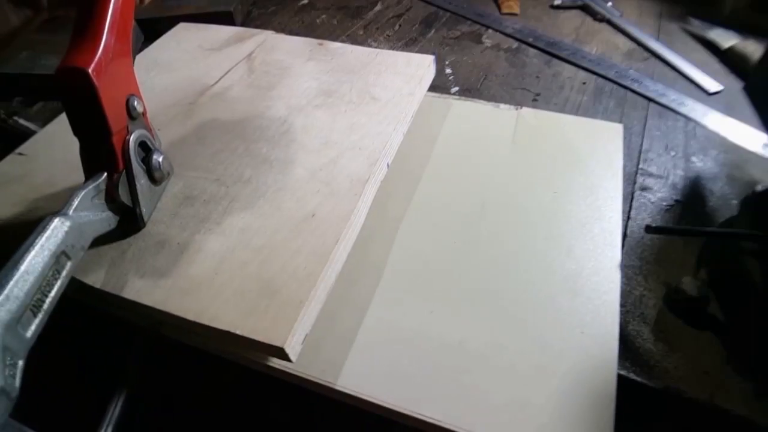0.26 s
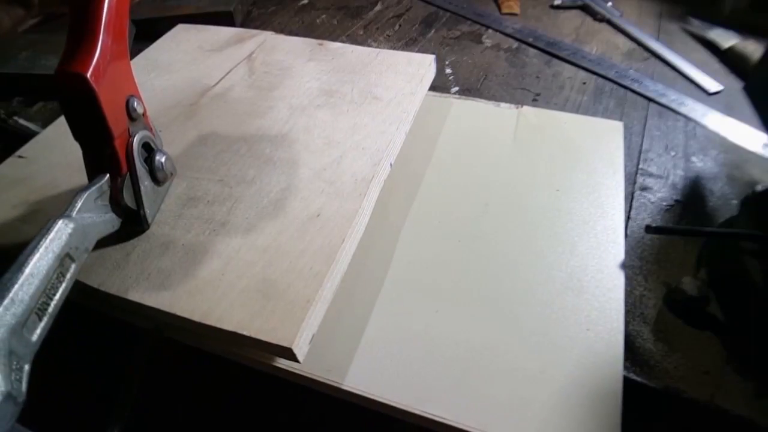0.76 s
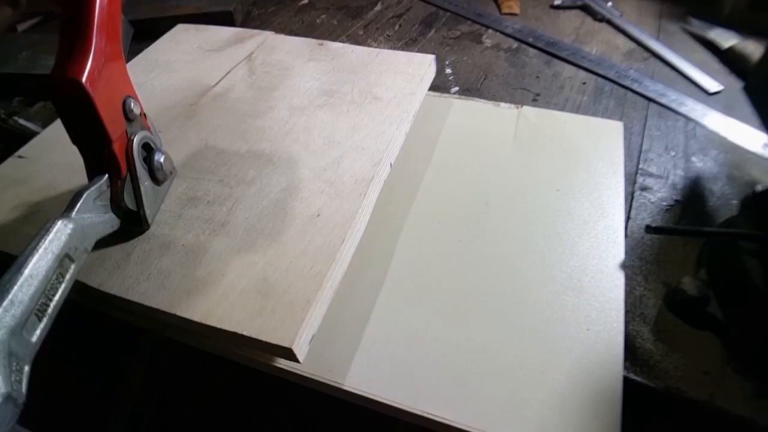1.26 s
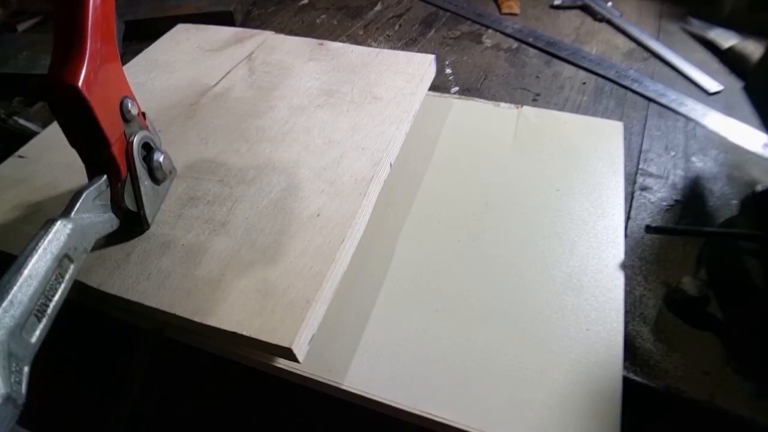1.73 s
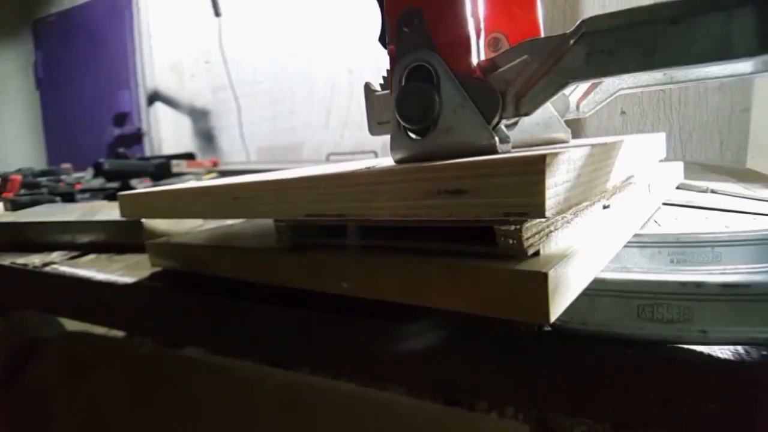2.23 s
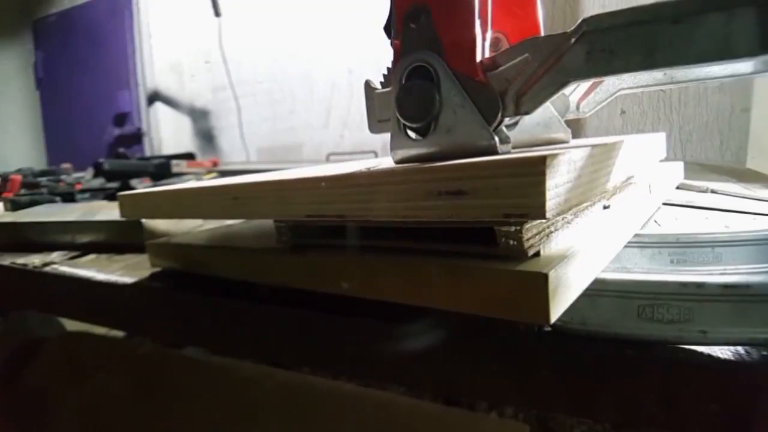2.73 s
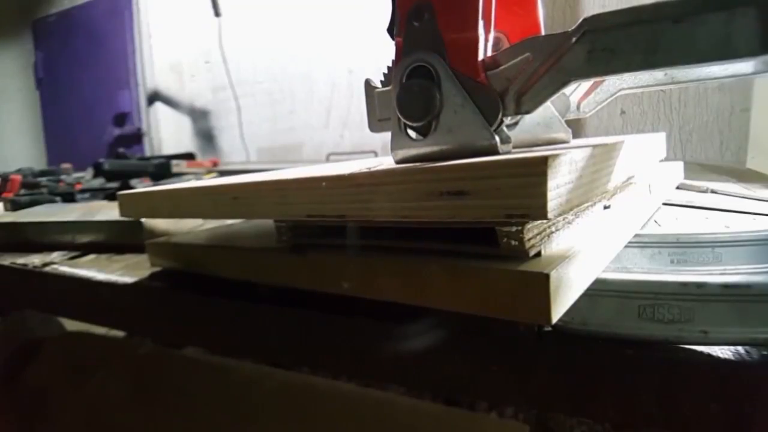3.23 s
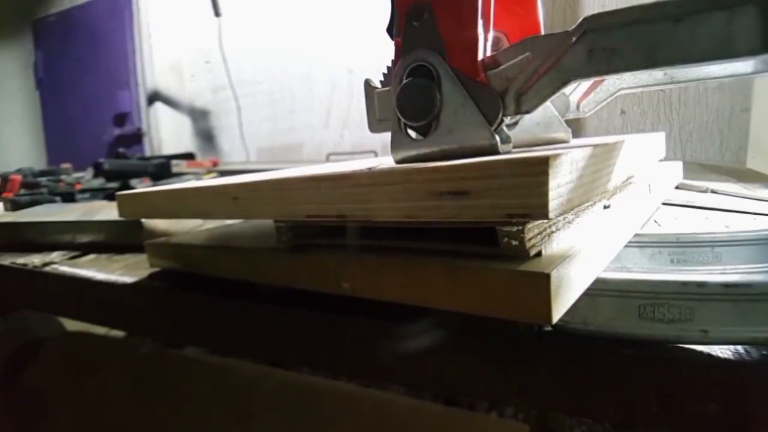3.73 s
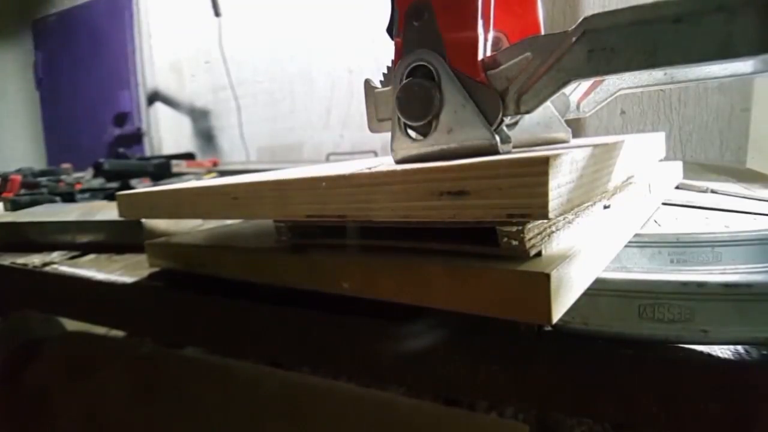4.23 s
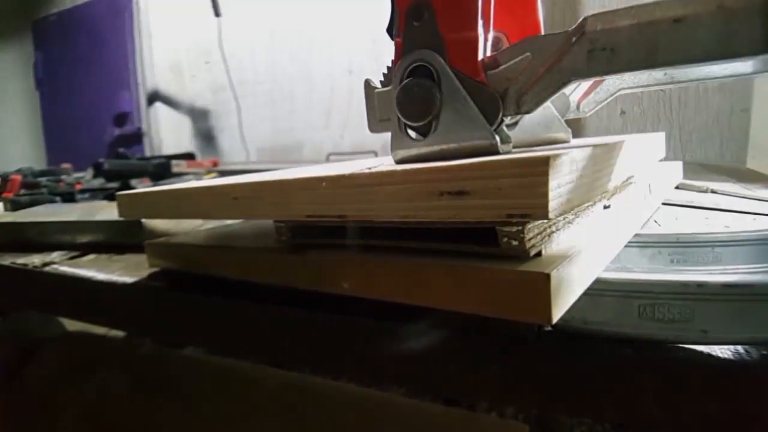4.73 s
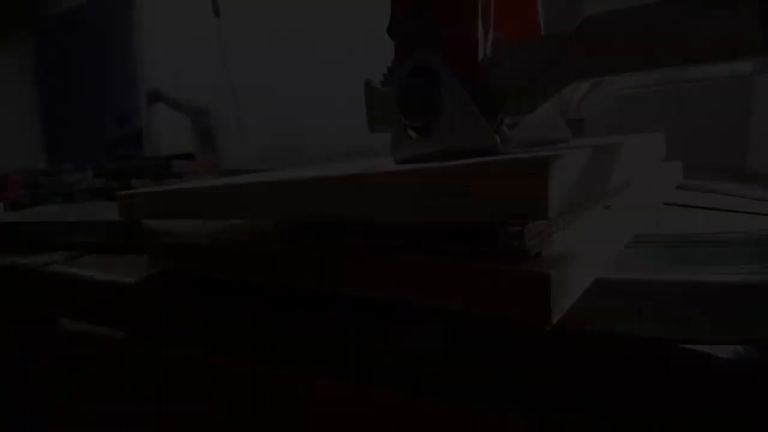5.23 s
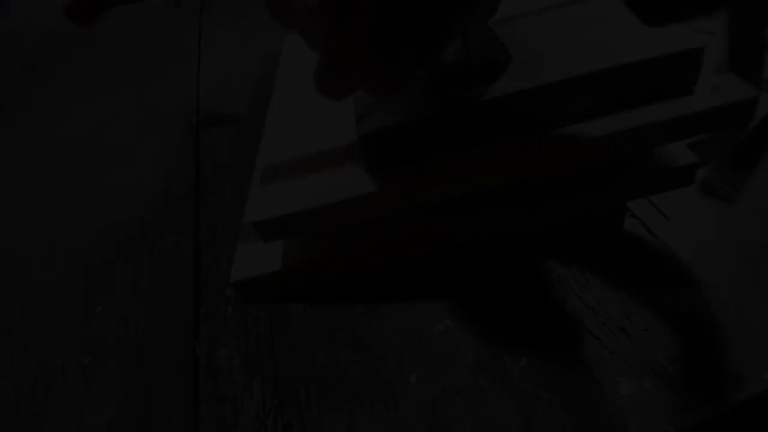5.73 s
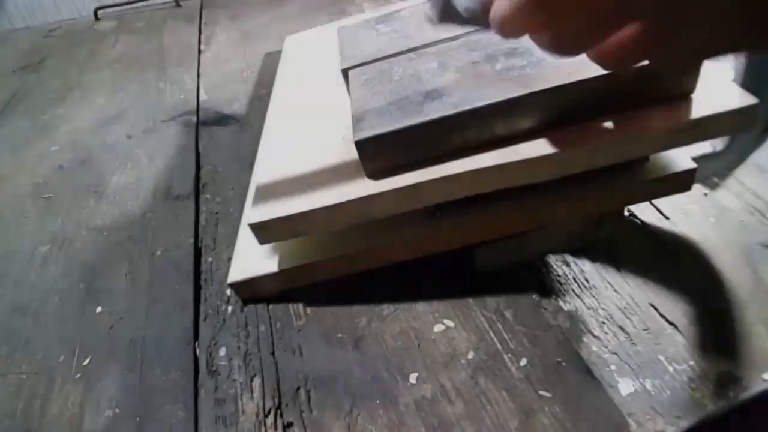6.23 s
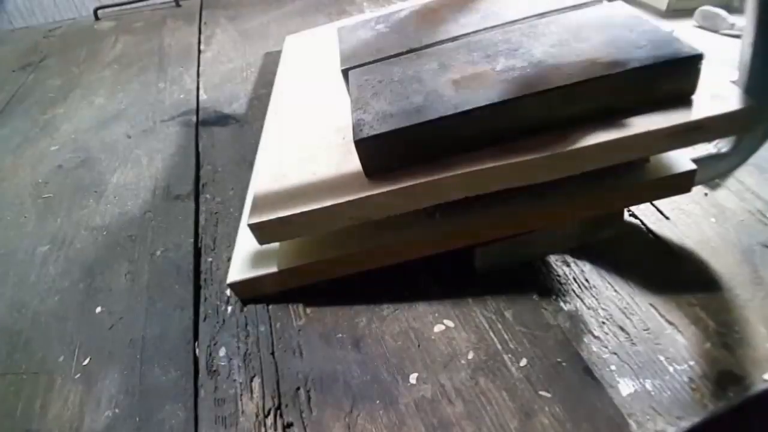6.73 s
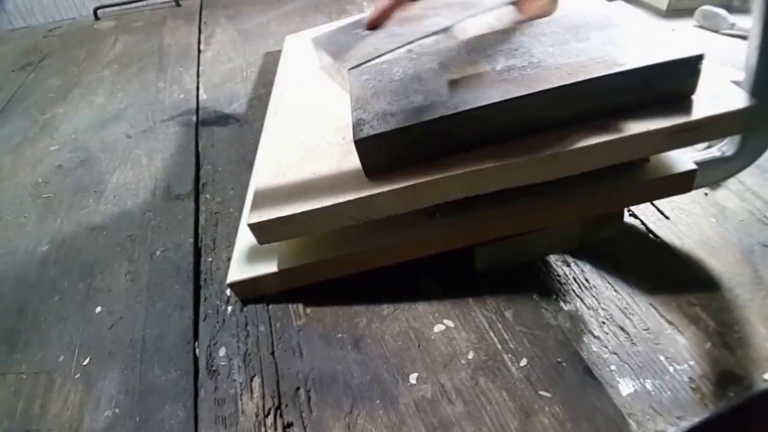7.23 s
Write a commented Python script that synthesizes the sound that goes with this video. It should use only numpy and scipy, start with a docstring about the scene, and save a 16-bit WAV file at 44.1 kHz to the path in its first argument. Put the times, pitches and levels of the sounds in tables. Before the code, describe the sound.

Over a low room hum, a clamp clacks loudly four times about a second apart; hands rustle, steel blocks thud, scrape and slide on wood.

```python
"""Quiet workshop: a ratchet clamp snaps shut four times on plywood boards, hands and sleeves rustle over
the bench, then steel blocks are set down and dragged. Low hum and faint hiss lie underneath; the sound fades
and returns twice. Struck parts are sums of decaying modes; rubbing, dragging, hum and hiss are shaped noise;
blows and blocks get an echo of decaying noise bands."""
import sys
import numpy as np
from scipy import signal
from scipy.fft import rfft, irfft
from scipy.io import wavfile

SR = 44100
rng = np.random.default_rng(int(sys.argv[2]) if len(sys.argv) > 2 else 0)


def digitize_waveform(pressure):
    """Quantize a signal to 16-bit integers and store it at the path in sys.argv[1].

    Rows of a 2-D input are taken as channels; values are limited to [-1, 1].
    """
    field = np.atleast_2d(pressure).T
    bounded = np.clip(field, -1, 1)
    quanta = np.round(bounded * 32767).astype(np.int16)
    wavfile.write(sys.argv[1], SR, quanta)


N = 330309

# jaw knocking on the boards: t/s, peak/dB, f/Hz, length/ms, board ring re peak/dB, L-R/dB
KNOCKS = [(0.383, -29.5, 364, 11.7, -4, -2.5), (0.399, -20.5, 830, 10, -1, -0.5),
          (1.34, -34, 397, 16, -3, 1), (1.365, -13.5, 1128, 11, -6.5, -1.5),
          (2.398, -33.5, 840, 11.6, -0.5, -3), (2.413, -5, 890, 18.5, -9, -3.5),
          (3.1, -34.5, 870, 16, -27.5, 6.5), (3.136, -31, 898, 11.2, -11, -4),
          (3.139, -36.5, 1312, 9, -8.5, 5), (3.263, -5, 871, 12.3, -14, -4)]
# board modes: f/Hz, level/dB, t60/s
BOARD_MODES = [(209, -10, 0.077), (391, -3.5, 0.051), (587.6, -16.5, 0.038), (649.3, -3, 0.19),
               (782, -4, 0.057), (840, -2.5, 0.16), (904, 1.5, 0.076), (955, -5, 0.11), (1030, -6.5, 0.071),
               (1042, -3.5, 0.17), (1135, -4.5, 0.11), (1232, -1, 0.066), (1340, -5.5, 0.15),
               (1534, -9.5, 0.057)]
# ratchet pawl snapping home: t/s, level/dB, brightest f/Hz, crack re level/dB, ring and echo re level/dB, L-R/dB
SNAPS = [(0.3844, -19.5, 2777, -10, 14, 2.5), (0.3965, -6, 5700, 0, 8, 3), (1.3646, -5, 5370, -5.5, 4, 4.5),
         (2.3973, -36.5, 2506, -1, 6.5, 0.5), (2.413, -17.5, 3025, -1, 14, 1),
         (2.4188, -10.5, 3900, 2, 4.5, 1.5), (3.138, -35, 3400, -26, 3, -1.5),
         (3.2625, -25, 2795, 1, 24, 6.5), (3.266, -5.5, 3730, -6, -4, 5)]
# clamp steel modes: f/Hz, level/dB, t60/s
CLAMP_MODES = [(1280, -1, .015), (2170, -4, .012), (2560, -9, .012), (2910, -1, .016), (3400, -7, .012),
               (3740, 1, .013), (4200, -5, .012), (4700, -8, .012), (5300, -3, .012), (5900, -5, .012),
               (6720, 1, .012), (8500, -14, .01)]
# clamp bar and loose parts ringing on: f/Hz, level/dB, t60/s
JANGLE_MODES = [(1660, -1, .14), (1880, -1, .18), (2215, -2, .15), (2545, -1, .14), (2912, -1, .18),
                (3343, -5, .13), (3740, -5, .15), (4300, -8, .14), (4750, -6, .14), (5400, -7, .13),
                (5930, -12, .12), (6720, -10, .12)]
# pawl crack colour: f/Hz, level/dB per Hz
CRACK_COLOUR = [(900, -8), (1500, 0.5), (3500, 4.5), (5500, -14), (7000, -7), (8500, -17.5), (16000, -13)]
# steel on steel: t/s, clink level/dB, ring f/Hz, thud level/dB, thud f/Hz, L-R/dB
CLINKS = [(5.795, -46.5, 11500, -59.5, 864, -8), (5.8104, -43.5, 7320, -62, 301, -5),
          (5.8385, -48, 3870, -65, 301, 22), (5.902, -43, 3920, -39, 600, -2),
          (5.9268, -67, 5490, -28.5, 920, 1), (6.001, -34.5, 5160, -21.5, 560, -15),
          (6.0145, -35, 5050, -22, 700, 0), (6.0304, -36, 4900, -20, 422, -3),
          (6.1604, -32.5, 5000, -14.5, 667, -14), (6.236, -36.5, 5840, -22, 330, -4),
          (6.3043, -48, 5200, -19.5, 643, -18), (6.3426, -40.5, 5500, -25, 434, 31),
          (6.3519, -71, 5200, -24.5, 930, 10)]
# steel block modes: f/Hz, level/dB, t60/s
STEEL_MODES = [(3100, -4, .08), (3800, -2, .3), (4040, -5, .15), (5140, -3, .11), (5560, -1, .14),
               (6200, -4, .06), (7130, -12, .25), (8890, -6, .3), (11640, -6, .2), (14560, -1, .16)]
# blocks dragged: t/s, bench rumble level/dB, plank drone level/dB
DRAG = [(5.8, -75.5, -77), (5.832, -51.5, -48), (5.978, -46, -46), (6.024, -26, -37), (6.168, -37, -35),
        (6.238, -25, -42), (6.294, -32.5, -42), (6.352, -28.5, -36.5), (6.454, -48.5, -42.5),
        (6.572, -35, -40.5), (6.636, -64.5, -56.5), (6.76, -52, -66)]
# bench resonances: f/Hz, width/Hz, level/dB
BENCH_PEAKS = [(88, 56, -3.5), (150.6, 30, 3.5)]
# plank resonances: f/Hz, width/Hz, level/dB
PLANK_PEAKS = [(203.1, 79, 2.5), (300, 56, 7.5)]
# board stack resonances: f/Hz, width/Hz, level/dB
STACK_PEAKS = [(425.2, 12, 4.5), (496.7, 55, -8), (641.4, 74, -2), (853, 140, -6), (955, 160, -9.5),
               (1320, 86, -20)]
# grit hiss colour: f/Hz, level/dB per Hz
GRIT_COLOUR = [(1200, -13.5), (1320, -1.5), (2130, -8), (4080, -6), (4550, -9.5), (5300, -7), (7250, -20.5),
               (16000, -27.5)]
# steel squealing as it slides: t/s, hold/s, level/dB, f/Hz
SQUEALS = [(6.036, 0.071, -47.5, 5100), (6.18, 0.038, -48.5, 4040), (6.356, 0.02, -51.5, 3830),
           (6.44, 0.089, -64, 5400), (6.495, 0.081, -57, 1910), (7.33, .04, -53.5, 3490)]
# block slid along the wood: t/s, level/dB
SLIDE = [(7.28, -72), (7.33, -42), (7.372, -36.5), (7.38, -29), (7.43, -27.5), (7.49, -28)]
# resonances of the slide: f/Hz, width/Hz, level/dB
SLIDE_PEAKS = [(151, 21, 1), (585, 70, -1), (800, 94, 0), (950, 110, 2.5), (1180, 120, 3), (1740, 250, -12),
               (2100, 200, -2), (3030, 89, -13.5), (3500, 200, -20.5)]
# hand movements over the bench: t/s, hold/s, rubbing level/dB, cloth level/dB
STROKES = [(0.0, 0.068, -67, -71), (0.871, 0.081, -58.5, -65), (1.049, 0.35, -69, -71.5),
           (1.942, 0.2, -57.5, -66), (3.142, 0.0039, -45, -77), (3.435, .1, -56.5, -70),
           (3.598, 0.042, -59, -58.5), (3.693, 0.12, -46, -52), (3.804, 0.01, -38, -48),
           (3.892, 0.018, -42.5, -50.5), (3.979, 0.0089, -41, -45), (4.102, 0.13, -59.5, -59),
           (4.348, 0.051, -51.5, -54.5), (4.522, 0.085, -50.5, -58.5), (4.656, 0.44, -63.5, -61),
           (4.78, 0.016, -58, -57), (5.152, 0.063, -52, -56), (5.374, 0.049, -54, -57),
           (6.717, 0.71, -66, -78.5), (7.115, 0.046, -82, -57.5)]
# rubbing colour: f/Hz, level/dB per Hz
RUB_COLOUR = [(88, -35), (150, -5.5), (177, -10.5), (273, -2), (403, -8), (986, -5.5), (1150, -9.5),
              (2500, -18.5), (3600, -70.5)]
# cloth colour: f/Hz, level/dB per Hz
CLOTH_COLOUR = [(800, -20.5), (1730, -3.5), (2040, -7), (3740, -7), (8530, -17.5), (13300, -19),
                (16000, -42)]
# ticks of grit and fingers: t/s, level/dB, f/Hz
TICKS = [(0.6113, -40, 3100), (2.634, -40, 4000), (2.845, -41, 2460), (3.103, -44, 2500),
         (3.5174, -35, 3866), (3.598, -30, 1780), (3.649, -31, 4330), (3.677, -22, 2240),
         (3.703, -22, 1500), (3.909, -17, 1200), (4.325, -43, 5000), (4.367, -35, 5000), (4.38, -25, 3500),
         (4.462, -36, 1300), (4.52, -28, 2520), (4.537, -21, 2000), (4.565, -33, 2400),
         (4.598, -25.5, 2250), (4.787, -43, 2500), (4.798, -29, 5560), (4.86, -36, 5300),
         (5.036, -26, 1960), (5.170, -21, 1200), (6.278, -32, 9000), (6.8001, -32, 3340),
         (7.152, -26, 2690), (7.377, -12, 2320)]
# dull bumps through the bench: t/s, level/dB, f/Hz, frame sway level/dB
BUMPS = [(0.278, -40, 182, -81), (4.847, -37.5, 107, -44), (4.923, -39, 116, -36), (5.368, -47, 287, -69),
         (6.975, -36, 145, -48)]
# shop background: t/s, hum level before a 4 dB cut/dB, hiss level/dB
SHOP = [(0, -51.5, -63), (1.0, -55.5, -71.5), (1.9, -51.5, -67), (1.93, -51, -64), (3.3, -49.5, -64.5),
        (4.5, -50.5, -59.5), (5.78, -55, -58), (5.8, -51, -84.5), (7.49, -49, -50.5)]
# hum colour: f/Hz, level/dB per Hz
HUM_COLOUR = [(40, -46), (87, -23.5), (123, -22.5), (154, 1), (182, -6.5), (503, -11.5), (543, -19.5),
              (604, -42), (703, -13.5), (1500, -29), (3300, -120)]
# room resonances in the hum: f/Hz, width/Hz (5 at least), level/dB
HUM_PEAKS = [(94, 8.7, -0.5), (155.9, 3.9, 2.5), (217, 36, -14), (559.4, 42, -8.5)]
# hiss colour: f/Hz, level/dB per Hz
HISS_COLOUR = [(710, -33), (1320, -3.5), (2400, -6), (3360, -10), (5180, -16.5), (5780, -10), (7820, -20.5),
               (16000, -14.5)]
# left-right likeness: f/Hz, correlation (1 = alike)
LIKENESS = [(60, 0.8), (180, 0.98), (550, 0.56), (1650, -0.16), (4970, 0.0033), (15000, -0.11)]
# reverberation time: f/Hz, t60/s
SHOP_T60 = [(100, 0.39), (500, 0.29), (2000, 0.2), (6000, 0.25), (14000, 0.22)]
# echo colour: f/Hz, level/dB
WALL_COLOUR = [(60, -22), (150, 0), (300, 8), (900, -5), (1500, -1), (4000, -5.5), (6500, -5.5),
               (8000, -14), (16000, -18)]
# fades: start t/s, lowest t/s, depth/dB, bend of the fall (exponent), return/s
FADES = [(1.762, 1.914, -26.5, 1.9, 0.025), (5.373, 5.792, -36, 0.89, 0.0043)]

THUD_DB, THUD_DB_PER_OCTAVE = -12.5, -7.5   # re a 400 Hz knock; higher knocks reach the bench less
SNAP_RISE_CYCLES, CLICK_REBOUND = 8.6, 0.94
DULL_ABOVE_RATIO, DULL_DB = 1.1, -11.5   # modes this far above the brightest pitch are barely struck
JANGLE_DB, CLINK_RING_DB = -27, -11
RASP_DB, DRAG_HISS_DB = -11, -16.5   # re plank drone
SKID_RASP_DB, SKID_RASP_FALL_DB_PER_S = -9.5, 189   # re thud
SKID_HISS_DB, SKID_HISS_FALL_DB_PER_S = -8, 257   # re clink
SKID_RISE_DB_PER_S = 3000
SQUEAL_WIDTH_HZ, SQUEAL_FADE_DB_PER_S = 45, 400
STROKE_RISE_DB_PER_S, STROKE_FALL_DB_PER_S = 344, 195.5
CRACKLE_PER_S, CRACKLE_DB = 250, -9   # re cloth
BUMP_DEEP_HZ = 35.1
OFFSET, CUTOFF_HZ = -0.00054, 16400


def clamp():
    """Jaw knocks on the boards and pawl snaps in the clamp's steel."""
    out = np.zeros((2, N))
    for row in KNOCKS:
        knock(out, *row)
    for row in SNAPS:
        snap(out, *row)
    return out


def knock(out, s, peak_db, hz, ms, ring_db, pan_db):
    """The jaw thumps the boards, which ring on; the bench thuds."""
    thump = throb(hz, ms)
    ring = modes(BOARD_MODES, hz, slope_db=11, rough=.25)
    add(out, s, thump, peak_db, pan_db)
    add(out, s, roomy(thump, -11.5), peak_db)
    add(out, s + ms / 2000, ring, peak_db + ring_db, pan_db)   # from mid-thump
    add(out, s, roomy(ring, 0.36), peak_db + ring_db)
    thud_db = peak_db + THUD_DB + THUD_DB_PER_OCTAVE * np.log2(hz / 400)
    add(out, s, swell(300, 4.7), thud_db - 6)
    add(out, s, roomy(swell(210, 0.29), 0.9), thud_db)   # the bench answers late and low


def snap(out, s, level_db, hz, crack_db, echo_db, pan_db):
    """The pawl cracks and rings the clamp's steel and loose parts; the walls return it."""
    add(out, s - .001, crack(1000 * SNAP_RISE_CYCLES / hz), level_db + crack_db, pan_db)
    struck = [(f, db + DULL_DB * (f > DULL_ABOVE_RATIO * hz), t60) for f, db, t60 in CLAMP_MODES]
    steel = modes(struck, hz, slope_db=4.5)
    ring = jangle(hz) * from_db(JANGLE_DB)
    add(out, s, steel, level_db, pan_db)
    add(out, s, ring, level_db + echo_db, pan_db)
    click = np.pad([1, -CLICK_REBOUND], (0, SR // 2 - 2))
    to_walls = from_db(-1.5) * click + from_db(-13) * steel + from_db(3) * ring
    add(out, s, roomy(to_walls, echo_db), level_db)


def throb(hz, ms):
    """A board squeezed and let go: a tone that swells and stops within ms; peak about 1."""
    t = np.arange(round(ms * SR / 1000)) / SR
    return np.hanning(len(t)) * np.sin(2 * np.pi * hz * t)


def crack(ms):
    """Splintering noise that rises for ms and dies, in the pawl's colour."""
    size = 1024
    t = np.arange(size) * 1000 / SR / ms
    gain = from_db(at_hz(CRACK_COLOUR, np.fft.rfftfreq(size, 1 / SR) + 1))
    noise = irfft(rfft(rng.standard_normal((2, size))) * gain)
    return rms_one(noise) * t * np.exp(1 - t) / 2


def jangle(hz):
    """The clamp's longer ring, each mode broken up by loose contact."""
    return modes(JANGLE_MODES, hz, slope_db=0, rough=.85)


def blocks():
    """Steel blocks clink, drag, squeal and slide; the room echoes them all."""
    out = clinks() + drag() + squeals() + slide()
    return out + roomy(out, -12.5)[:, :N]


def clinks():
    """Steel contacts: a noise crack, a brief all-mode ring, a rough longer ring, and a thud in the wood."""
    out = np.zeros((2, N))
    contact = [(f, 0, .03) for f, *_ in STEEL_MODES]   # every mode wakes for a moment
    wood = [(f, db, 2 / width) for f, width, db in PLANK_PEAKS + STACK_PEAKS]
    for s, clink_db, ring_hz, thud_db, thud_hz, pan_db in CLINKS:
        add(out, s, burst(1.5, low_hz=910), clink_db - 2, pan_db)
        add(out, s, modes(contact, ring_hz, slope_db=10), clink_db - 4, pan_db)
        buzz = from_db(4 * drift(40)[:SR // 2])   # loose contact roughens the ring
        ring = modes(STEEL_MODES, ring_hz, slope_db=45, far_db=30)
        add(out, s, buzz * ring, clink_db + CLINK_RING_DB, pan_db)
        add(out, s, swell(thud_hz, 1.2), thud_db)
        add(out, s, modes(wood, thud_hz, slope_db=4), thud_db - 5.5)
    return out


def drag():
    """Grit under the blocks excites bench, plank, board stack and air; each clink adds a short skid."""
    rumble, drone = gated(DRAG)
    s, clink_db, _, thud_db, _, _ = np.transpose(CLINKS)
    skid_rasp = strokes(s, 0 * s, thud_db + SKID_RASP_DB, SKID_RISE_DB_PER_S, SKID_RASP_FALL_DB_PER_S)
    skid_hiss = strokes(s, 0 * s, clink_db + SKID_HISS_DB, SKID_RISE_DB_PER_S, SKID_HISS_FALL_DB_PER_S)
    rasp = from_db(RASP_DB) * drone + skid_rasp
    hiss = from_db(DRAG_HISS_DB) * drone + skid_hiss
    out = rumble * resonant(grainy(37, 0.99), BENCH_PEAKS)
    out += drone * resonant(grainy(40, 4.7), PLANK_PEAKS)
    out += rasp * resonant(grainy(67, 2), STACK_PEAKS)
    out += hiss * coloured(grainy(120, 2.5), GRIT_COLOUR) * from_db([[-2], [2]])   # leans right
    return out


def squeals():
    """Sliding steel squeals: grainy noise through one narrow resonance each."""
    out = np.zeros((2, N))
    for row in SQUEALS:
        s, hold, level_db, hz = np.transpose([row])
        gain = strokes(s, hold, level_db, SQUEAL_FADE_DB_PER_S, SQUEAL_FADE_DB_PER_S)
        out += gain * resonant(grainy(55, 3.6), [(hz[0], SQUEAL_WIDTH_HZ, 0)])
    return out


def slide():
    """A block slid along wood: grit noise through resonances, plus a trace of bright noise."""
    grit = grainy(200, 1.5)
    sound = resonant(grit, SLIDE_PEAKS) + from_db(-31) * coloured(grit, CLOTH_COLOUR)
    return gated(SLIDE)[0] * sound * from_db([[1.5], [-1.5]])   # leans left


def hands():
    """Movements over the bench, with ticks and bumps."""
    return rustle() + ticks() + bumps()


def rustle():
    """Skin rubs on wood, cloth rustles and crackles: grainy noise and random impulses under each stroke."""
    s, hold, rub_db, cloth_db = np.transpose(STROKES)
    rub = strokes(s, hold, rub_db, STROKE_RISE_DB_PER_S, STROKE_FALL_DB_PER_S)
    cloth = strokes(s, hold, cloth_db, STROKE_RISE_DB_PER_S, STROKE_FALL_DB_PER_S)
    impulses = (rng.random(N) < CRACKLE_PER_S / SR) * rng.laplace(size=N)
    crackle = coloured(impulses * rng.uniform(.4, 1, (2, N)), CLOTH_COLOUR)
    skin = coloured(grainy(60, 1.5), RUB_COLOUR)
    weave = coloured(grainy(70, 2.2), CLOTH_COLOUR)
    return rub * skin + cloth * (weave + from_db(CRACKLE_DB) * crackle)


def ticks():
    """Grit and fingers: a short tone under a crack of band noise."""
    out = np.zeros((2, N))
    for s, level_db, hz in TICKS:
        add(out, s, swell(hz, .3), level_db - 15)
        add(out, s, burst(2, low_hz=hz / 3, high_hz=min(hz * 1.8, 15000)), level_db - 4)
    return out


def bumps():
    """Dull bumps through the bench, each with a deep sway of the frame."""
    out = np.zeros((2, N))
    for s, level_db, hz, sway_db in BUMPS:
        add(out, s, swell(hz, 9.9), level_db)
        add(out, s, swell(BUMP_DEEP_HZ, 21), sway_db)
    return out


def background():
    """Low hum gathered in a few room resonances, and a thin hiss."""
    hum_db, hiss_db = in_time(SHOP)
    hum = coloured(grainy(16, 2.2), HUM_COLOUR) + from_db(-2) * resonant(pair(N), HUM_PEAKS)
    hiss = coloured(grainy(12, 0.67), HISS_COLOUR)
    return from_db(hum_db - 4) * hum + from_db(hiss_db) * hiss


def echo():
    """The shop's answer to a click: dense echoes that build up over a few ms and die band by band."""
    size = SR // 2
    t, out = np.arange(size) / SR, 0
    octave = np.log2(np.fft.rfftfreq(size, 1 / SR) + 1)
    noise = rfft(pair(size)) * from_db(at_hz(WALL_COLOUR, 2 ** octave))
    for centre in range(6, 15):   # octave bands, 64 Hz to 16 kHz
        band = irfft(noise * np.clip(1 - np.abs(octave - centre), 0, 1), size)
        decay = from_db(-60 * t / at_hz(SHOP_T60, 2. ** centre))
        out = out + band * wobble(1, 90, .25) * decay
    out = out * np.clip((t - .004) / .0037, 0, 1)
    return out / np.sqrt(np.sum(out ** 2) / 2)   # mean energy 1 per ear


def roomy(sound, echo_db):
    """The echo of a sound, mixed to mono, from a fresh draw of the room."""
    mono = np.atleast_2d(sound).mean(axis=0)[None]
    return from_db(echo_db) * signal.fftconvolve(mono, echo(), axes=1)


def modes(table, focus_hz, slope_db, rough=0, far_db=22):
    """A struck body: the blow favours modes near its pitch; each ear hears other strengths and phases."""
    hz, level_db, t60 = np.transpose(table)[:, :, None]
    off_focus_db = slope_db * np.abs(np.log2(hz / focus_hz))
    level_db = level_db - np.minimum(off_focus_db, far_db)
    t = np.arange(SR // 2) / SR
    luck = rng.normal(size=(3, 2, len(table), 1))
    phase = np.pi * luck[1, 0] + luck[2] * np.minimum(hz / 1500, 3)
    gain = from_db(level_db + 2 * luck[0]) * wobble(len(table), 330, rough)
    envelope = np.minimum(t * hz, 1) * from_db(-60 * t / t60)   # rises over one cycle
    tones = gain * envelope * np.sin(2 * np.pi * hz * t + phase)
    return tones.sum(axis=1) / np.sqrt(np.sum(from_db(2 * level_db)))


def wobble(count, per_s, rough):
    """Half-second gains: a steady part plus a share of quick chance that smears a tone into a band."""
    t = np.arange(SR // 2) * per_s / SR
    steps = rng.standard_normal((count, 200))
    chance = np.array([np.interp(t, np.arange(200), row) for row in steps])
    return 1 - rough + rough * 1.2 * chance


def swell(hz, ms):
    """A soft blow: a tone whose envelope rises to 1 over ms and dies away."""
    t = np.arange(round(12 * ms * SR / 1000)) * 1000 / SR / ms
    return t * np.exp(1 - t) * np.sin(2 * np.pi * hz * t * ms / 1000)


def burst(ms, low_hz, high_hz=15000):
    """A crack of band noise decaying with time constant ms."""
    t = np.arange(round(8 * ms * SR / 1000)) * 1000 / SR / ms
    band = signal.butter(2, [low_hz, high_hz], "band", fs=SR, output="sos")
    return signal.sosfilt(band, rng.standard_normal((2, len(t))) * np.exp(-t)) / 2


def resonant(x, peaks):
    """Parallel two-pole resonances with alternating signs; rms 1."""
    out = 0
    for k, (hz, width_hz, level_db) in enumerate(peaks):
        r = np.exp(-np.pi * max(width_hz, 5) / SR)
        poles = [1, -2 * r * np.cos(2 * np.pi * hz / SR), r * r]
        gain = (-1) ** k * from_db(level_db) * (1 - r * r)
        out = out + gain * signal.lfilter([1, 0, -1], poles, x)
    return rms_one(out)


def coloured(x, spectrum):
    """Noise given a spectrum; rms 1."""
    gain = from_db(at_hz(spectrum, np.fft.rfftfreq(N, 1 / SR) + 1))
    return rms_one(irfft(rfft(x) * gain, N))


def grainy(rate_hz, grain_db):
    """Stereo noise whose level wanders at random, by grain_db rms."""
    return pair(N) * from_db(grain_db * drift(rate_hz))


def pair(size):
    """Stereo white noise, alike in the bass and nearly unrelated in the treble."""
    mid, side = rfft(rng.standard_normal((2, size)))
    alike = at_hz(LIKENESS, np.fft.rfftfreq(size, 1 / SR) + 1)
    both = np.sqrt(1 + alike) * mid + np.sqrt(1 - alike) * side * [[1], [-1]]
    return irfft(both, size) / np.sqrt(2)


def drift(rate_hz):
    """Slow chance of rms 1: noise through two equal poles, drawn every 40 samples."""
    r = np.exp(-2 * np.pi * rate_hz * 40 / SR)
    slow = signal.lfilter([1], [1, -2 * r, r * r], rng.standard_normal(N // 40 + 2002))[2000:]
    return np.interp(np.arange(N) / 40, np.arange(len(slow)), rms_one(slow))


def strokes(s, hold, level_db, rise, fall):
    """Power-summed gains of movements that rise, hold from s and fall at steady dB/s; every 32 samples."""
    t = np.arange(0, N + 32, 32) / SR - np.asarray(s)[:, None]
    loss_db = rise * np.maximum(-t, 0) + fall * np.maximum(t - hold[:, None], 0)
    gain = np.sqrt(np.sum(from_db(2 * (level_db[:, None] - loss_db)), axis=0))
    return np.interp(np.arange(N) / 32, np.arange(len(gain)), gain)


def gated(rows):
    """Gains of level curves, at -110 dB outside their span."""
    quiet = [-110] * (len(rows[0]) - 1)
    before, after = (rows[0][0] - .02, *quiet), (rows[-1][0] + .03, *quiet)
    return from_db(in_time([before, *rows, after]))


def in_time(rows):
    """Each column of a curve, sample by sample."""
    s, *columns = np.transpose(rows)
    return [np.interp(np.arange(N) / SR, s, column) for column in columns]


def at_hz(points, hz):
    """A spectrum read on a log-frequency axis."""
    f, value = np.transpose(points)
    return np.interp(np.log(hz), np.log(f), value)


def from_db(db):
    """Gain of a level."""
    return 10 ** (np.asarray(db) / 20)


def rms_one(x):
    """Scaled to unit rms."""
    return x / np.sqrt(np.mean(x ** 2) + 1e-20)


def add(out, s, sound, level_db, pan_db=0):
    """Places a sound at a time and side (pan_db = L-R)."""
    i = round(s * SR)
    sound = np.atleast_2d(sound)[:, :N - i]
    out[:, i:i + sound.shape[1]] += sound * from_db(level_db + np.array([[.5], [-.5]]) * pan_db)


def scene():
    """Blows and blocks carry the room's echo; rubbing hands are close and dry."""
    return clamp() + blocks() + hands() + background()


def fades():
    """Gain that sinks along a curve, then comes straight back."""
    t, gain_db = np.arange(N) / SR, 0
    for start, lowest, depth_db, bend, back in FADES:
        sunk = np.interp(t, [start, lowest, lowest + back], [0, 1, 0])
        gain_db = gain_db + depth_db * sunk ** bend
    return from_db(gain_db)


def record(dry):
    """The microphone drops the deep bass and rounds peaks; a small offset, fades and the top cut follow."""
    heard = signal.sosfilt(signal.butter(2, 70, "high", fs=SR, output="sos"), dry)
    rounded = .9 * np.tanh(heard / .9)
    faded = (rounded + OFFSET) * fades()
    return signal.sosfilt(signal.cheby2(12, 70, CUTOFF_HZ, fs=SR, output="sos"), faded)


dry = scene()
out = record(dry)
digitize_waveform(out)
```